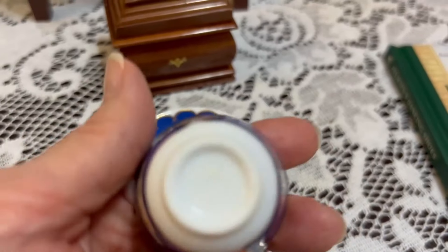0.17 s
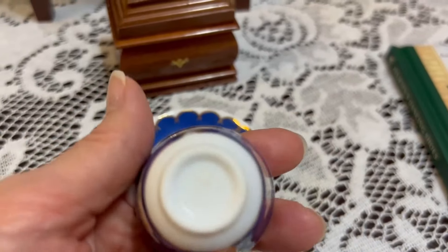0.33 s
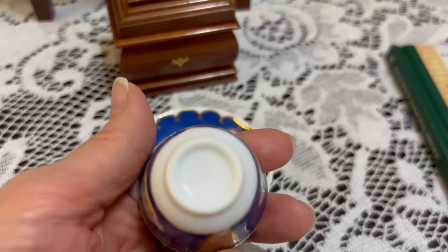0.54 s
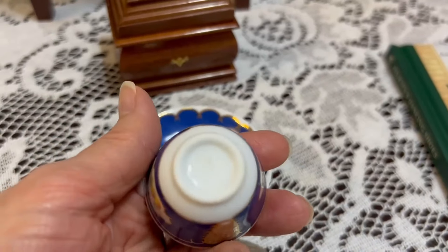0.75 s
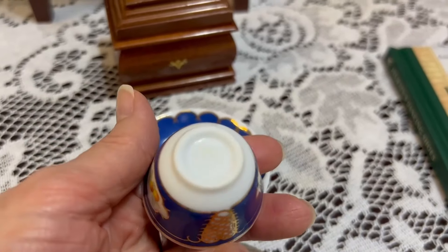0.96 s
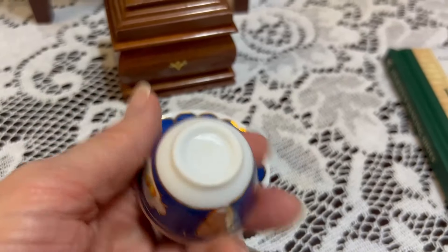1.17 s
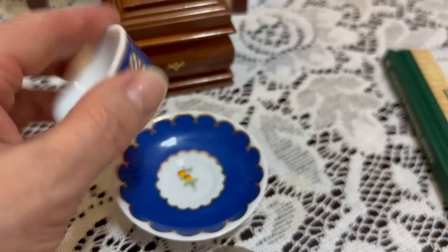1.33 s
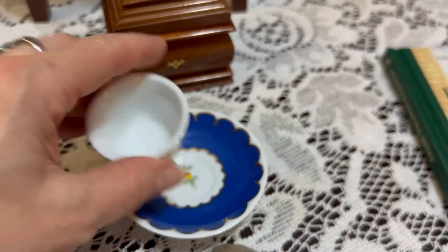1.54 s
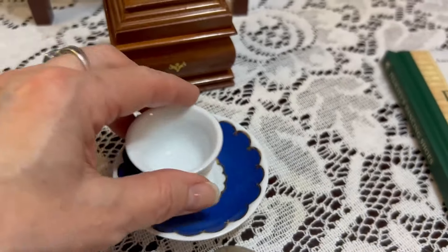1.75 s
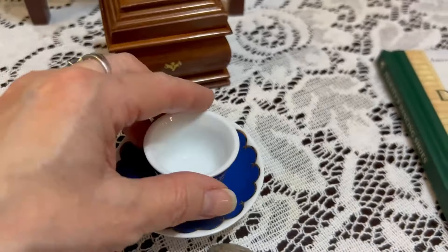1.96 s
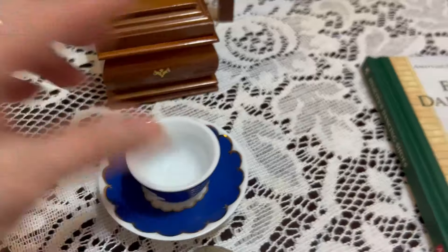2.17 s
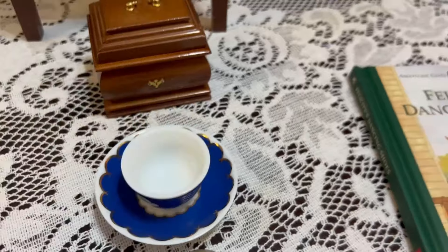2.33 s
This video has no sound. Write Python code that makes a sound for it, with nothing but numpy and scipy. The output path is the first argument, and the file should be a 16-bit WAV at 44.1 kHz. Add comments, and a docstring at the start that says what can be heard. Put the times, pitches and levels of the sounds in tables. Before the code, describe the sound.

A tiny porcelain cup clinks brightly onto its saucer on a cloth-covered table indoors

```python
"""Room tone and a low appliance hum run throughout; a tiny ceramic cup in the hand ticks against a finger ring.
Skin then slides on the glaze as the cup turns: resonant hiss and two faint squeaks.
The cup is set on its saucer on a cloth-covered table, with low handling rumble toward the end.
Each contact is a few quick scraping bounces, noise rattle, table thud and decaying ring modes.
A small quiet room answers with two dull echoes and a noise tail."""
import sys
import numpy as np
from scipy import signal
from scipy.fft import rfft, irfft
from scipy.io import wavfile
from scipy.ndimage import uniform_filter1d

SR = 44100
rng = np.random.default_rng(int(sys.argv[2]) if len(sys.argv) > 2 else 0)


def wav_out(sig):
    """Save sig, one row per channel (or a flat mono array), as 16-bit PCM at SR to the path in sys.argv[1]."""
    wavfile.write(sys.argv[1], SR, np.round(np.clip(np.atleast_2d(sig).T, -1, 1) * 32767).astype(np.int16))


N = 105751
T = np.arange(N) / SR

# room tone spectrum: (frequency [Hz], relative density [dB])
AIR_SPECTRUM = [(25, -2), (50, -4), (114, -7), (200, -13), (236, -9.5), (263, -20), (317, -7.5),
                (354, -25.5), (1160, -34), (3430, -45.5), (16000, -55.5)]
# room tone stereo width: (frequency [Hz], side minus mid [dB])
AIR_SIDE_MID = [(60, -15), (200, -8.5), (700, -4.5), (1300, 1), (15000, -3.5)]
# room tone level: (time [s], level [dB])
AIR_LEVEL = [(0, -58), (2.4, -52)]
# wavering appliance tones: (frequency [Hz], level [dB], width [Hz])
HUM_TONES = [(301, -65.5, 67), (130.8, -75.5, 4.9)]
# low handling rumble: (time [s], level [dB])
RUMBLE_LEVEL = [(1.85, -81), (1.92, -50), (2.05, -69), (2.12, -42), (2.25, -79), (2.29, -50), (2.38, -50.5)]
# contacts: (time [s], click level [dB], click colour [Hz], bounce rate [Hz], bounce loss step [dB],
#   rattle level [dB], rattle t60 [s], cup level [dB], cup ring-length share [1], cup overtone level [dB],
#   saucer level [dB], table thud level [dB], left minus right [dB])
CONTACTS = [(0.0243, -53.5, 845, 485, 34, -70, 0.026, -90, 0.8, -88, -97, -51, -2),
            (0.6333, -38, 4150, 322, 7, -33, 0.012, -59.5, 1.2, -42, -67.5, -92, -4),
            (0.6362, -21, 6480, 323, 8.5, -36.5, 0.037, -24.5, 0.38, -48, -93, -63.5, -2.5),
            (0.6484, -40.5, 3326, 477, 8, -50.5, 0.077, -27, 0.56, -54, -93.5, -78, -3.5),
            (1.1545, -27, 3500, 311.2, 0, -39.5, 0.057, -17, 0.99, -33, -88, -58, -2.5),
            (1.5905, -44.5, 4950, 341, 14, -58, 0.043, -46.5, 0.41, -66, -125, -77, -5),
            (1.6945, 3.5, 5270, 310.3, 5, -19, 0.12, 2, 1.154, -20, -74.5, -27.5, -3),
            (1.7609, -44, 2485, 484, 5, -25.5, 0.074, -46, 0.94, -84, -63, -41, -4.5),
            (1.7692, -24.5, 4210, 218.5, 5, -28.5, 0.088, -37, 0.45, -77, -82, -51.5, -2),
            (1.8995, -4.5, 3735, 518.6, -6.5, -16, 0.078, -18.5, 0.52, -53.5, -84, -47, -3),
            (2.0561, -46.5, 3730, 630, 7.5, -34.5, 0.085, -38.5, 0.95, -82, -90, -75, -2.5),
            (2.0666, -16, 3670, 398, 5, -22.5, 0.11, -20, 0.5, -46.5, -49.5, -34, -3),
            (2.101, -15.5, 3790, 598, -2, -23, 0.11, -23, 0.93, -67, -52.5, -45, -1),
            (2.117, -8, 4180, 538, 2, -26, 0.078, -24.5, 0.64, -70, -40, -39.5, -3.5),
            (2.1236, -31.5, 3770, 281, 6, -40, 0.041, -37, 0.78, -55, -53, -37.5, -4),
            (2.1285, -33, 4050, 387.6, 0, -24, 0.038, -15.5, 0.52, -65, -41, -44, -4.5),
            (2.2142, -44, 1000, 497, 21, -74, 0.025, -54, 0.98, -90, -87, -45, -6.5),
            (2.2649, -33, 4470, 425, 0.5, -38.5, 0.022, -64.5, 0.33, -61, -90, -53, 1.5),
            (2.2738, -27, 3700, 701, 1.5, -40.5, 0.013, -77, 0.24, -48, -85, -65.5, -2)]
# colour of the dense rattle: (frequency [Hz], level [dB])
RATTLE_COLOUR = [(300, -10.5), (1000, -14.5), (2900, 2.5), (3850, -1.5), (4800, -2), (6800, -12),
                 (8000, -40), (11000, -46)]
# ring modes: (frequency [Hz], level [dB], t60 [s], rise [ms]), both times at full ring length
CUP_MODES = [(6027, 0, .105, 5), (6023, -19, .33, 5)]
OVERTONE_MODES = [(11442, 0, .12, 1.4)]
SAUCER_MODES = [(9224, 0, .24, 3)]
TABLE_MODES = [(138.5, -4, 0.12, 6), (283.4, 0, 0.029, 0.16), (333, -3, 0.049, 0.66)]
# nearest surfaces: (delay [ms], left level [dB], right level [dB])
NEAR_ECHOES = [(6.8, -24, -11.5), (12.6, -15.5, -17.5)]
# room tail bands: (frequency [Hz], level [dB], t60 [s])
TAIL_BANDS = [(300, 3, 0.29), (690, 3.5, 0.23), (1470, -3, 0.29), (2725, -9.5, 0.33), (4065, -11, 0.24),
              (6280, -23, 0.32), (12000, -19.5, 0.28)]
# two microphone ports: (frequency [Hz], left minus right [dB])
PORT_LEVEL = [(200, 2), (500, 7.3), (1500, 2.5), (6000, 6.5), (11400, 6.6)]
# two microphone ports: (frequency [Hz], left lead [rad])
PORT_LEAD = [(300, 0.5), (1600, 0.93), (2760, 0.68), (3300, 1), (6000, 1), (9200, -2.28), (11400, -1.5)]
# skin on glaze: (time [s], hiss gain [dB], squeak frequency [Hz], squeak level [dB],
#   upper squeak frequency [Hz], upper squeak level [dB])
SLIDE_COURSE = [(1.12, -76, 2930, -104, 3600, -106), (1.19, -65.5, 3104, -76, 3660, -87),
                (1.26, -71, 3000, -68.5, 3950, -76), (1.32, -68, 3140, -73.5, 4000, -81),
                (1.39, -68, 3220, -80, 4320, -76), (1.47, -67.5, 3190, -85, 4140, -77),
                (1.56, -71, 2915, -66.5, 3540, -66), (1.64, -80, 2790, -84, 3420, -92)]
# hiss resonances: (frequency [Hz], width [Hz], level [dB])
HISS_BANDS = [(1530, 240, -6), (2170, 310, -4), (3520, 1100, -1), (5270, 1000, -4), (6970, 1800, -6),
              (12500, 1900, -14)]

RUMBLE_HZ, RUMBLE_WIDTH_HZ = 50.5, 50
SCATTER_DB, SMEAR_MS = 1.5, 0.84  # bounce level spread; scrape decay time
CLICK_WIDTH_SHARE = 0.6  # of the click colour
BODY_DB, BODY_WIDTH_HZ = 2.5, 354  # rattle resonance at the click colour
RATTLE_RISE_MS, KNOCK_TOP_HZ = 0.9, 7790
SPARK_OVER_OVERTONE_DB, SPARK_HZ, SPARK_WIDTH_HZ = 20, 13370, 3300
FLUTTER_DB, FLUTTER_ZERO_SHARE, FLUTTER_RATE_HZ = 2, 1.2262, 364  # dB per unit of lost ring share
TAIL_SPREAD, TAIL_WIDTH_SHARE, TAIL_RISE_S, RING_WET_DB = 0.47, 0.72, 0.033, 7
SQUEAK_WANDER_HZ, PITCH_WANDER_HZ, PITCH_WANDER_SHARE = 18, 22, 0.00564
SQUEAK_SIDE_DB = 2.5  # up on the left, down on the right
BASS_CUT_HZ, TOP_HZ = 40, 16900


def amp(db):
    """Decibels to amplitude."""
    return 10 ** (np.asarray(db, float) / 20)


def unit(x):
    """Scale to RMS 1."""
    return x / np.sqrt(np.mean(x ** 2))


def band(x, hz, width_hz):
    """Two-pole-pair band-pass centred geometrically on hz."""
    low_hz = np.sqrt(hz ** 2 + width_hz ** 2 / 4) - width_hz / 2
    high_hz = min(low_hz + width_hz, SR / 2.1)
    return signal.sosfilt(signal.butter(2, [low_hz, high_hz], "band", fs=SR, output="sos"), x)


def dull(x):
    """Steep low-pass above the body of the knocks."""
    return signal.sosfilt(signal.butter(6, KNOCK_TOP_HZ, fs=SR, output="sos"), x)


def curve(table, col=1):
    """Table column interpolated over time."""
    table = np.array(table)
    return np.interp(T, table[:, 0], table[:, col])


def on_log(table, hz):
    """Table values interpolated over log frequency."""
    table = np.array(table)
    return np.interp(np.log(hz + 1), np.log(table[:, 0]), table[:, 1])


def walk(rate_hz):
    """Random wander, RMS 1: noise averaged twice over 1 / rate_hz."""
    k = int(SR / rate_hz)
    smooth = uniform_filter1d(rng.standard_normal(N), k)
    return unit(uniform_filter1d(smooth, k))


def air():
    """Shaped stereo noise for room tone, narrow noise bands for hum and hand rumble."""
    hz = np.arange(N // 2 + 1) * SR / N
    mid_db = on_log(AIR_SPECTRUM, hz)
    side_db = mid_db + on_log(AIR_SIDE_MID, hz)
    mid = irfft(rfft(rng.standard_normal(N)) * amp(mid_db), N)
    side = irfft(rfft(rng.standard_normal(N)) * amp(side_db), N)
    stereo = mid + side * np.array([[1], [-1]])
    tone = stereo * amp(curve(AIR_LEVEL)) / np.std(mid)
    hum = sum(amp(db) * unit(band(rng.standard_normal(N), f, width)) for f, db, width in HUM_TONES)
    rumble = unit(band(rng.standard_normal(N), RUMBLE_HZ, RUMBLE_WIDTH_HZ))
    return tone + hum + rumble * amp(curve(RUMBLE_LEVEL))


def ring(modes, share=1.):
    """Decaying sines that swell in; a damped ring is shorter and swells sooner."""
    t = T[:SR // 2]
    out = np.zeros(len(t))
    for hz, db, t60_s, rise_ms in modes:
        decay = amp(db - 60 * t / t60_s / share)
        swell = (1 - np.exp(-t * 1000 / rise_ms / share ** 2)) ** 2
        out += np.sin(2 * np.pi * hz * t) * decay * swell
    return out


def contact(row, chance, noise, grit, flutter):
    """Bounces scrape over a dense rattle and a thud; the blow rings cup and saucer."""
    (_, click_db, click_hz, rate_hz, loss_db, rattle_db, rattle_t60_s,
     cup_db, share, over_db, saucer_db, thud_db, _) = row
    t, k = T[:len(noise)], np.arange(len(chance))

    # bounce signs alternate; each loss exceeds the last by one step
    pulses = np.zeros(len(noise))
    at = (k * (1 + .06 * np.tanh(chance)) * SR / rate_hz).astype(int)
    bounce_db = SCATTER_DB * chance - max(loss_db, .9) * k * (1 + k) / 2
    pulses[at] = (-1) ** k * amp(bounce_db)
    scrape = grit * np.exp(-t[:len(grit)] * 1000 / SMEAR_MS)
    scrape = scrape / np.sqrt(np.sum(scrape ** 2))
    scraped = pulses + np.convolve(pulses, scrape)[:len(t)]
    click = dull(band(scraped, click_hz, CLICK_WIDTH_SHARE * click_hz))
    click = amp(click_db) * click / np.abs(click[:80]).max()

    body = noise + amp(BODY_DB) * band(noise, click_hz, BODY_WIDTH_HZ)
    rattle_rise = 1 - np.exp(-t * 1000 / RATTLE_RISE_MS)
    rattle = amp(rattle_db - 60 * t / rattle_t60_s) * rattle_rise * body
    knock = click + rattle + amp(thud_db) * ring(TABLE_MODES)

    treble = band(np.convolve(pulses ** 2, scrape)[:len(t)], SPARK_HZ, SPARK_WIDTH_HZ)
    spark = amp(over_db + SPARK_OVER_OVERTONE_DB) * treble
    cup = amp(cup_db) * ring(CUP_MODES, share) + amp(over_db) * ring(OVERTONE_MODES, min(share, 1))
    # a tighter grip shortens the ring and deepens its flutter under the fingers
    cup = cup * amp(FLUTTER_DB * (FLUTTER_ZERO_SHARE - share) * flutter)
    return np.array([knock, spark + cup + amp(saucer_db) * ring(SAUCER_MODES)])


def crockery():
    """All contacts, panned by level: knocks and rings, each in two channels."""
    n = SR // 2
    out = np.zeros((2, 2, N + SR))
    colour = amp(on_log(RATTLE_COLOUR, np.arange(n // 2 + 1) * SR / n))
    for row in CONTACTS:
        chance = rng.standard_normal(4)
        noise = unit(irfft(rfft(rng.standard_normal(n)) * colour, n))
        grit = rng.standard_normal(200)
        sound = contact(row, chance, noise, grit, walk(FLUTTER_RATE_HZ)[:n])
        at = int(row[0] * SR)
        pan = amp([[row[-1] / 2], [-row[-1] / 2]])
        out[..., at:at + n] += sound[:, None] * pan
    return out[..., :N]


def room():
    """Impulse responses: dull near echoes, and a noise tail partly shared by both ears."""
    t = T[:SR // 2]
    shared, apart = rng.standard_normal((2, len(t)))
    noise = shared + TAIL_SPREAD * apart * np.array([[1], [-1]])
    tail = np.zeros(noise.shape)
    for hz, db, t60_s in TAIL_BANDS:
        decay = amp(db - 60 * t / t60_s) / np.sqrt(t60_s * SR / 14)  # energy-normalized
        tail += band(noise, hz, TAIL_WIDTH_SHARE * hz) * decay
    near = np.zeros(tail.shape)
    for delay_ms, left_db, right_db in NEAR_ECHOES:
        near[:, int(delay_ms * SR / 1000)] += amp([left_db, right_db])
    return dull(near), tail * (1 - np.exp(-t / TAIL_RISE_S))


def ports(x):
    """Each port hears a near source with its own level and phase."""
    hz = np.arange(N // 2 + 1) * SR / N
    half = np.array([[.5], [-.5]])
    level = amp(half * on_log(PORT_LEVEL, hz))
    phase = np.exp(1j * half * on_log(PORT_LEAD, hz))
    return irfft(rfft(x) * level * phase, N)


def slide():
    """Skin slides over the turning glaze: band-passed hiss and two faint wavering squeaks."""
    hiss = sum(amp(db) * unit(band(rng.standard_normal((2, N)), hz, width))
               for hz, width, db in HISS_BANDS)
    out = hiss * amp(curve(SLIDE_COURSE))
    for col in (2, 4):
        hz = curve(SLIDE_COURSE, col) * (1 + PITCH_WANDER_SHARE * walk(PITCH_WANDER_HZ))
        phase = 2 * np.pi * np.cumsum(hz) / SR
        squeak = walk(SQUEAK_WANDER_HZ) * np.sin(phase) + walk(SQUEAK_WANDER_HZ) * np.cos(phase)
        pan = amp([[SQUEAK_SIDE_DB], [-SQUEAK_SIDE_DB]])
        out = out + squeak * amp(curve(SLIDE_COURSE, col + 1)) * pan
    return out * (T > SLIDE_COURSE[0][0]) * (T < SLIDE_COURSE[-1][0])


def scene():
    """Contacts and their room reply through the ports, plus air and slide."""
    knocks, rings = crockery()
    near, tail = room()
    knocks_wet = signal.fftconvolve(knocks, near + tail, axes=1)
    rings_wet = signal.fftconvolve(rings, amp(RING_WET_DB) * tail, axes=1)
    wet = (knocks_wet + rings_wet)[:, :N]
    return ports(knocks + rings + wet) + air() + slide()


def record(dry):
    """The phone cuts the lowest bass and the top."""
    bass_cut = signal.butter(4, BASS_CUT_HZ, "high", fs=SR, output="sos")
    top_cut = signal.ellip(8, .2, 60, TOP_HZ, fs=SR, output="sos")
    return signal.sosfilt(np.vstack([bass_cut, top_cut]), dry)


dry = scene()
out = record(dry)
wav_out(out)
```